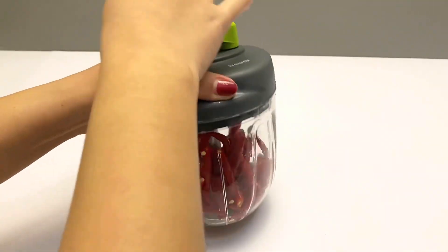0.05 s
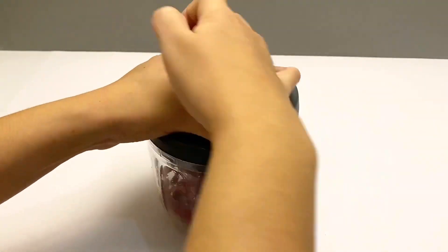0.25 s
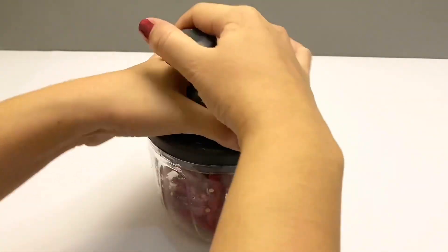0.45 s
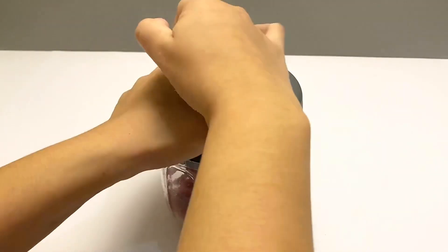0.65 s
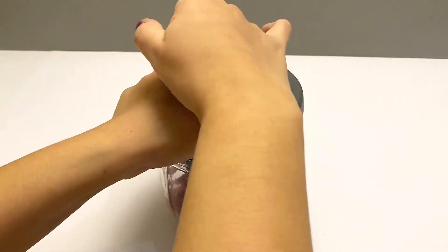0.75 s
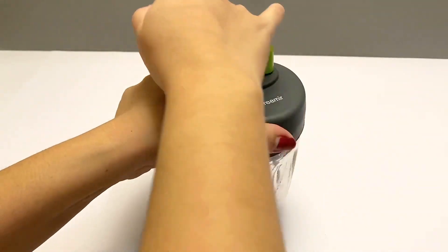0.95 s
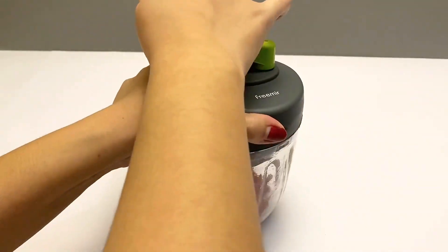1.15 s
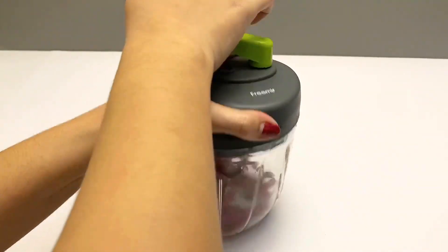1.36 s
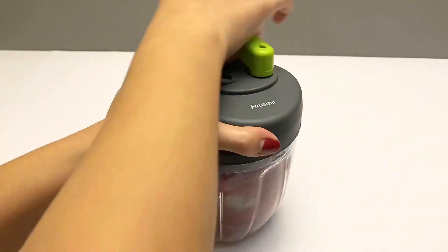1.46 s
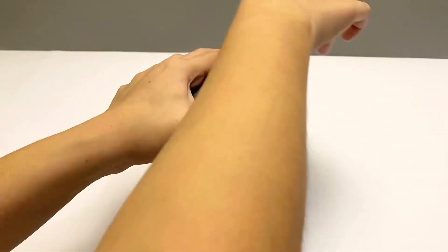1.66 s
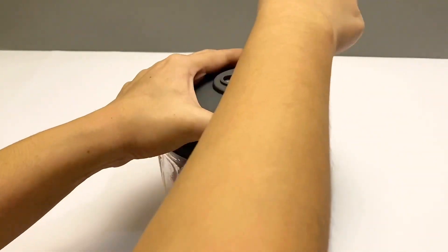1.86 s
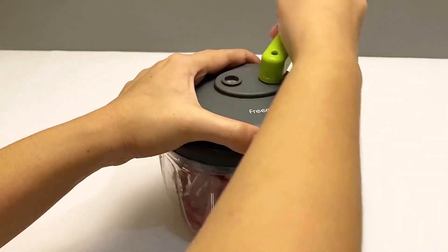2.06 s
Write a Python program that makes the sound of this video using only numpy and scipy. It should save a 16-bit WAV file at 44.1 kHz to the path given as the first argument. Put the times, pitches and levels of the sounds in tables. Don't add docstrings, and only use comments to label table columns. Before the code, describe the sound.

Close up in a quiet home kitchen, a plastic manual chopper knocks on a hollow table, grinds chillies briefly, settles, then crunches hard with rattling clicks and thumps before dying away to soft handling sounds.

```python
import sys
import numpy as np
from scipy import signal
from scipy.fft import rfft, irfft, next_fast_len
from scipy.io import wavfile
from scipy.ndimage import uniform_filter1d, map_coordinates

SR = 44100
rng = np.random.default_rng(int(sys.argv[2]) if len(sys.argv) > 2 else 0)


def file_out(sig):
    cols = np.atleast_2d(sig).T
    lim = np.clip(cols, -1, 1)
    pcm = np.round(lim * 32767).astype(np.int16)
    wavfile.write(sys.argv[1], SR, pcm)


def volts_from_db(level):
    exponent = np.asarray(level, float) / 20
    return 10 ** exponent


N = 92610
TIME = np.arange(N) / SR
EVENT_TIME = np.arange(SR // 10) / SR


def unit(x):
    return x / np.sqrt(np.mean(x ** 2) + 1e-20)


def along(points, hz):
    f, v = np.transpose(points)
    return np.interp(np.log(hz + 1), np.log(f + 1), v)


def curve(rows, outside):
    s, v = np.transpose(rows)
    return np.interp(TIME, s, v, outside, outside)


def wobble(rate):
    knots = rng.standard_normal(int(N * rate / SR) + 4)
    return map_coordinates(knots, [np.arange(N) * rate / SR])


def filtered(x, response):
    m = next_fast_len(x.shape[-1] + SR // 2)
    spectrum = rfft(x, m) * response(np.fft.rfftfreq(m, 1 / SR))
    return irfft(spectrum, m)[..., :x.shape[-1]]


def body(modes):
    def mode(f, center, width, db):
        return volts_from_db(db) * 1j * f * width / (center * center - f * f + 1j * f * width)
    return lambda f: sum((-1) ** k * mode(f, *row) for k, row in enumerate(modes))


def add_at(out, s, sound):
    out[round(s * SR):][:len(sound)] += sound


# f/Hz, level/dB per Hz
ROOM_TONE = [(15, -51.5), (25, -6), (115, -1.5), (156, -13), (665, -26), (1030, -28), (2300, -33.5),
             (2750, -38), (12000, -64.5), (15600, -117), (22000, -120)]
# f/Hz, correlation
COHERENCE = [(60, 0.52), (180, 1), (550, 0.19), (1650, 0.094), (4970, 0.28), (15000, 0.05)]


def hush():
    def mid_and_side(f):
        angle = np.arccos(np.clip(along(COHERENCE, f), -1, 1)) / 2
        return volts_from_db(along(ROOM_TONE, f)) * f ** 2 / (f ** 2 + 45 ** 2) * [np.cos(angle), np.sin(angle)]
    mid, side = filtered(rng.standard_normal((2, N)), mid_and_side)
    level = volts_from_db(-60 + 0.27 * wobble(7.95))
    return level * np.array([mid + side, mid - side]) / np.std(filtered(mid, lambda f: f > 300))


def hum():
    level = volts_from_db(-44.5 + 1.43 * wobble(2.8))
    return level * np.sin(2 * np.pi * 100.5 * TIME + .5 * wobble(4.95))


def fan():
    noise = rng.standard_normal((2, N))
    return volts_from_db(-71 + 0.83 * wobble(3)) * unit(filtered(noise, body([(1980, 260, 0)])))


# f/Hz, T60/s
KITCHEN_T60 = [(200, 0.84), (2000, 0.41), (10000, 0.53)]


def kitchen(x):
    hz, t, z = signal.stft(rng.standard_normal((2, SR // 2)), SR, nperseg=256)
    decay = volts_from_db(-60 * t / along(KITCHEN_T60, hz)[:, None])
    tail = signal.istft(z * decay, SR, nperseg=256)[1]
    delayed = np.pad(x, (200, 0))[None]
    return signal.fftconvolve(delayed, tail / np.linalg.norm(tail[0]), axes=1)[:, :N]


def near(x):
    t = np.arange(SR // 20) / SR
    burst = rng.standard_normal(len(t)) * volts_from_db(-60 * t / 0.032)
    echoes = filtered(burst, body([(815, 1400, 0)]))
    side = signal.fftconvolve(np.pad(x, (40, 0)), echoes / np.linalg.norm(echoes))[:N]
    return np.array([side, -side])


# t/s, level/dB
SLIDE = [(0, -80), (.2, -69), (.3, -73), (.43, -60.5), (.55, -74), (.62, -82), (.69, -67), (.8, -80),
         (.9, -65), (1.05, -74), (1.2, -79), (1.75, -63), (1.88, -71), (1.97, -93), (2.06, -69)]
# f/Hz, level/dB per Hz
SKIN = [(800, -31), (2000, 3), (4000, -5), (7000, -9.5), (11000, -24.5), (15000, -16), (18000, -26)]


def hands():
    noise = rng.standard_normal((2, N))
    partly_alike = noise + noise[0]
    rustle = unit(filtered(partly_alike, lambda f: volts_from_db(along(SKIN, f))))
    return volts_from_db(curve(SLIDE, None) + 2.3 * wobble(40.75)) * rustle


# t/s, push level/dB
PUSH = [(0, -46), (.2, -45.5), (.3, -35.5), (.46, -36.5), (.57, -35.5), (.66, -36), (.74, -39.5),
        (.88, -56), (1.02, -37.5), (1.13, -44.5), (1.32, -50), (1.45, -37.5), (1.6, -34.5), (1.8, -40.5),
        (1.97, -51), (2.07, -38)]
# f/Hz, bandwidth/Hz, level/dB
TABLE = [(67, 7.9, -9.5), (80.5, 6, -4.5), (100.33, 10.5, 1.5), (124.6, 9.6, -5.5), (148.2, 12.1, -1),
         (210, 8.9, -5), (257.1, 9.6, -12.5), (310, 7.7, -8.5), (357.3, 26, -11.5), (498.5, 10.5, -11.5)]


def leaning():
    rock_hz, peak_s, depth = 16, .585, 0.38
    noise = rng.standard_normal(N)
    slow_push = lambda f: body(TABLE)(f) / (1 + 1j * f / 60) ** 5
    force = noise * volts_from_db(curve(PUSH, None) + 0.27 * wobble(32.4))
    boom = filtered(force, slow_push) / np.std(filtered(noise, slow_push))
    return boom * (1 + depth * np.cos(2 * np.pi * rock_hz * (TIME - peak_s)))


# t/s, level/dB, contact time/s
THUMPS = [(0.242, -16, 0.0033), (0.257, -20, 0.0064), (0.3, -24.5, 0.0043), (0.352, -30.5, 0.0053),
          (.42, -37, 0.0044), (.565, -35.5, 0.0087), (0.616, -41, 0.0057), (0.681, -36, 0.011),
          (1.009, -40.5, 0.0032), (1.034, -38, 0.0058), (.955, -40.5, 0.0028), (.985, -36, 0.004),
          (1.401, -26.5, 0.0052), (1.419, -24.5, 0.0031), (1.44, -26, 0.0022), (1.499, -39.5, 0.003),
          (1.545, -29, 0.0031), (1.579, -24.5, 0.0056), (1.642, -31, 0.0043), (1.785, -29.5, 0.0094),
          (2.049, -52, 0.0066)]


def thumps():
    slap_db, slap_t60 = -18.5, 0.16
    force, slap, t = np.zeros(N + SR), np.zeros(N + SR), EVENT_TIME
    for s, db, contact in THUMPS:
        pulse = np.sin(np.pi * np.minimum(t / contact, 1)) ** 2
        add_at(force, s, volts_from_db(db - 4) * pulse / (contact * 10))
        add_at(slap, s, volts_from_db(db + slap_db - 60 * t / slap_t60) * rng.standard_normal(len(t)))
    slap_tone = lambda f: body([(454, 200, 17)])(f) / (1 + 1j * f / 2500)
    return filtered(force[:N], body(TABLE)), filtered(slap[:N], slap_tone)


# f/Hz, bandwidth/Hz, level/dB
JAR = [(696, 170, -1.5), (961, 32, -5), (980, 200, -16), (1174, 102, 6.5), (1223, 170, 0), (1510, 30, -17),
       (1837, 410, -13), (2100, 133, -2), (2220, 24, -17), (2770, 60, -6), (3067, 250, -7),
       (3590, 480, -14), (3898, 114, -10), (4890, 440, -26)]
# t/s, level/dB, f/Hz, T60/s
TICKS = [(.239, -29, 667, 0.14), (0.268, -45, 2260, 0.015), (0.28, -23.5, 1560, 0.038),
         (.281, -25.5, 930, 0.054), (0.339, -48.5, 6340, 0.039), (0.405, -50, 4220, 0.016),
         (0.422, -56, 5140, 0.049), (0.446, -51, 6000, 0.019), (.508, -43.5, 774, 0.063),
         (0.53, -38, 1310, 0.04), (0.675, -54, 2500, 0.032), (0.929, -36.5, 2465, 0.019),
         (.939, -23, 2370, 0.023), (.94, -24.5, 3440, 0.04), (1.037, -35, 1450, 0.018),
         (1.074, -37.5, 1460, 0.0045), (1.131, -48.5, 1750, 0.1), (1.158, -61, 1160, .03),
         (1.253, -46.5, 1500, 0.016), (1.267, -46.5, 1330, 0.029), (1.283, -48, 1730, 0.017),
         (1.409, -22, 2330, 0.027), (1.431, -17.5, 2290, 0.05), (1.615, -27, 3580, 0.015),
         (1.693, -40, 3070, 0.013), (1.702, -30, 1350, 0.014), (1.785, -47, 4250, 0.011),
         (1.802, -34.5, 3660, 0.016), (2.042, -61, 1500, 0.042), (2.058, -44.5, 617, 0.038),
         (.318, -43, 1840, 0.036), (.286, -44.5, 3470, 0.11), (.345, -45, 1850, 0.014),
         (0.947, -45, 4630, 0.047), (0.964, -40, 3900, .08), (1.091, -50, 1500, .012),
         (1.099, -53, 1700, .02), (1.376, -28.5, 1850, 0.02), (1.389, -37, 2000, .015),
         (1.418, -18, 2000, 0.015), (1.444, -23, 2240, 0.012), (1.46, -30, 2100, 0.018),
         (1.487, -26, 3180, .015), (1.529, -28, 2670, .015), (1.562, -27, 2850, 0.067),
         (1.578, -32, 3460, 0.025), (1.74, -50, 2360, 0.022)]


def ticks():
    rise_s, edge, ring_db = 0.00073, 1.08, -1
    out, t = np.zeros(N + SR), EVENT_TIME
    for s, db, hz, t60 in TICKS:
        burst = rng.standard_normal(len(t)) * volts_from_db(-60 * t / t60) * (1 - np.exp(-t / rise_s))
        burst[0] = edge * np.sqrt(t60 * 1000)
        peak = body([(hz, hz * 0.5, 0)])
        modes = body([(c, w, ring_db + rng.normal(0, 4)) for c, w, _ in JAR])
        tick = filtered(burst, lambda f: peak(f) * (peak(f) + modes(f) / (1 + 1j * f / hz / 1.4) ** 2))
        add_at(out, s, volts_from_db(db) * tick / np.abs(tick).max())
    return out[:N]


# t/s, level/dB, T60/s
CRACKS = [(0.28, -49, 0.017), (.34, -54.5, 0.047), (.403, -51, 0.08), (.421, -43, 0.037),
          (0.446, -50.5, 0.034), (0.941, -55, 0.0072), (1.364, -44, 0.0082), (1.802, -32.5, 0.016)]


def cracks():
    out, t = np.zeros(N + SR), EVENT_TIME
    for s, db, t60 in CRACKS:
        bright = filtered(rng.standard_normal(len(t)), body([(5500, 9300, 0), (15000, 1600, -7)]))
        add_at(out, s, volts_from_db(db - 60 * t / t60) * bright)
    return out[:N]


# t/s, level/dB, length/s
JAMS = [(.971, -41.5, 0.0057), (.991, -43.5, 0.0077), (1.003, -61, 0.011), (1.16, -57, 0.0088),
        (1.37, -36.5, 0.0054), (1.398, -30, .006), (1.431, -31, 0.011), (1.461, -33, .007),
        (1.476, -30, 0.0073), (1.489, -27, 0.0062), (1.5, -26.5, 0.0097), (1.518, -29, .007),
        (1.526, -26, 0.003), (1.544, -30.5, 0.0085), (1.563, -33, .006), (1.578, -35, 0.0091),
        (1.591, -35, .008), (1.614, -32, 0.007), (1.629, -36, 0.0041), (1.643, -40.5, 0.01),
        (1.679, -34, 0.0049), (1.689, -32, 0.0062), (1.744, -53, 0.007), (1.765, -54.5, 0.0099)]


def jams():
    air_hz, air_t60, spread, beat_hz = 1195, 0.037, .018, 70
    out, t = np.zeros(N + SR), EVENT_TIME
    chances = rng.standard_normal((len(JAMS), 3)).clip(-1.5, 1.5)
    for (s, db, length), (bend, phase, beat) in zip(JAMS, chances):
        hz = air_hz * (1 + spread * bend)
        swell = np.sin(np.pi / 2 * np.minimum(t / length * 2, 1)) ** 2
        decay = volts_from_db(-60 * np.maximum(t - length, 0) / air_t60)
        tone = np.sin(2 * np.pi * hz * t + 3 * phase)
        partner = .5 * np.sin(2 * np.pi * (hz + beat_hz * beat) * t)
        add_at(out, s, volts_from_db(db) * swell * decay * (tone + partner))
    return out[:N] * (1 + .3 * wobble(500))


def teeth():
    per_s, center_hz, spread, cycles = 900, 2730, 0.607, 1.9
    at, pitch, size = rng.random((3, int(per_s * N / SR)))
    detune = np.exp(spread * np.log(pitch / (1 - pitch)) / 2).clip(.3, 3.5)
    hz = center_hz * detune[:, None]
    k = np.arange(SR // 150)
    level = volts_from_db(-5 * np.log(size).clip(-3, 0))[:, None]
    clicks = level * np.sin(2 * np.pi * hz * k / SR) * np.exp(-k / SR * hz / cycles * 2)
    places = (at * N).astype(int)[:, None] + k
    return unit(np.bincount(places.ravel(), clicks.ravel(), N + len(k))[:N])


def grit():
    grains_per_s, spread_db, snap_s, rasp_share = 2200, 6.5, 0.00076, 0.57
    chance, size, noise = rng.random(N), rng.exponential(size=N), rng.standard_normal((2, N))
    breaks = chance < grains_per_s / SR * volts_from_db(5 * wobble(60))
    starts = breaks * volts_from_db(spread_db * size.clip(0, 3))
    snaps = np.convolve(starts, np.exp(-np.arange(SR // 200) / SR / snap_s))[:N] * noise[0]
    rasp = noise[1] * volts_from_db(4.4 * wobble(90))
    return unit(np.sqrt(1 - rasp_share) * unit(snaps) + np.sqrt(rasp_share) * rasp)


# t/s, grinding level/dB
STROKES = [
    [(0.86, -82), (0.932, -45), (0.94, -44), (0.956, -47), (0.992, -45.5), (1.024, -49.5), (1.04, -62),
     (1.048, -62), (1.14, -88)],
    [(1.33, -77), (1.366, -40.5), (1.398, -37), (1.416, -25), (1.52, -28), (1.674, -39.5), (1.688, -35.5),
     (1.79, -59), (1.88, -64.5)],
]
# f/Hz, level/dB per Hz
CRUNCH = [(300, -7.5), (700, -9), (1200, -4.5), (1700, -16), (4000, -24.5), (7000, -23), (11000, -25),
          (16000, -23)]


def grinding():
    jar_db, crunch_db, shake_db, teeth_db, wide_db = -5.5, -0.5, 5.5, -9.5, -7
    level_db = np.maximum(*[curve(rows, -120) for rows in STROKES])
    loudest = level_db.max()

    def growing(power):
        return volts_from_db(loudest + power * (level_db - loudest))

    def ring(gain, response):
        return filtered(gain * grit(), response) / np.std(filtered(grit(), response))

    crackle = lambda f: volts_from_db(along([(100, -61.5)] + CRUNCH, f))
    far_crackle = lambda f: volts_from_db(along([(100, -65)] + CRUNCH[:-3] + [(9000, -46)], f))
    jar = volts_from_db(jar_db) * ring(volts_from_db(level_db), body(JAR))
    crunch = volts_from_db(crunch_db) * ring(growing(1.36), crackle)
    shake = volts_from_db(shake_db) * ring(growing(0.86), body(TABLE))
    far_jar = ring(volts_from_db(level_db + jar_db), body(JAR))
    far_crunch = ring(volts_from_db(level_db + crunch_db + 2), far_crackle)
    wide = volts_from_db(wide_db) * (far_jar + far_crunch) * [[1], [-1]]
    return jar + crunch + volts_from_db(teeth_db + level_db) * teeth(), shake, wide


def two_ports(air):
    in_step_hz, comb_hz = 6950, 4150
    lag = lambda f: np.minimum(-2 * np.pi * (f - in_step_hz) / comb_hz, f / 4000)
    return filtered(air, lambda f: np.exp(1j * lag(f) * np.array([[.5], [-.5]])))


def scene():
    ground, shake, wide = grinding()
    thump, slap = thumps()
    air = ground + ticks() + cracks() + jams() + slap
    radiation = lambda f: (1j * f / 55) ** 2 / (1 + 1j * f / 55) ** 2
    low = filtered(shake + leaning() + thump, radiation)
    upper_boom = filtered(low, lambda f: f ** 2 / (f ** 2 + 200 ** 2))
    direct = two_ports(air) + low + wide
    echoes = volts_from_db(-18.5) * near(air + volts_from_db(2.0) * upper_boom)
    room = volts_from_db(-6.5) * kitchen(air) + volts_from_db(-16.5) * kitchen(low)
    return direct + echoes + room + hush() + hum() + hands() + fan()


def top_cut(x):
    return signal.sosfilt(signal.butter(12, 16470, fs=SR, output="sos"), x)


# f/Hz, left over right level/dB
LEAN = [(60, 3.5), (240, 2.5), (950, 2.5), (3770, 3), (8000, 1), (15000, -0.5)]
# from f/Hz, to f/Hz
MID_GAPS = [(8300, 9650), (12400, 13750), (15800, 22050)]
# from f/Hz, to f/Hz
SIDE_GAPS = [(6300, 7600), (10400, 11800), (14600, 22050)]
# from t/s, to t/s
FULL_BAND = [(.275, .29), (.935, .945), (1.36, 1.485), (1.797, 1.808)]


def record(dry):
    def port_response(f):
        imbalance = volts_from_db(along(LEAN, f) * np.array([[.5], [-.5]]))
        return imbalance * (f < 15870) * f ** 4 / (f ** 4 + 32 ** 4)

    def inside(v, spans):
        return np.any([(v > a) & (v < b) for a, b in spans], axis=0)

    def gap_response(f):
        gaps = 1. * np.array([inside(f, MID_GAPS), inside(f, SIDE_GAPS)])
        return uniform_filter1d(gaps, size=400, axis=1)

    left, right = filtered(dry, port_response)
    pair = np.array([left + right, left - right]) / 2
    attacks = uniform_filter1d(inside(TIME, FULL_BAND) * 1., size=SR // 200)
    mid, side = pair - filtered(pair, gap_response) * (1 - attacks)
    return top_cut(np.array([mid + side, mid - side]))


dry = scene()
out = record(dry)
file_out(out)
```